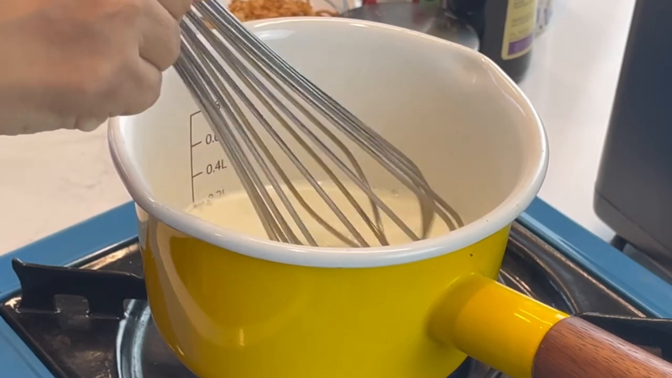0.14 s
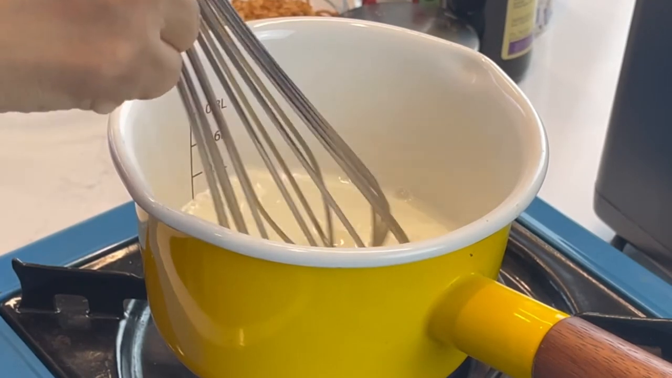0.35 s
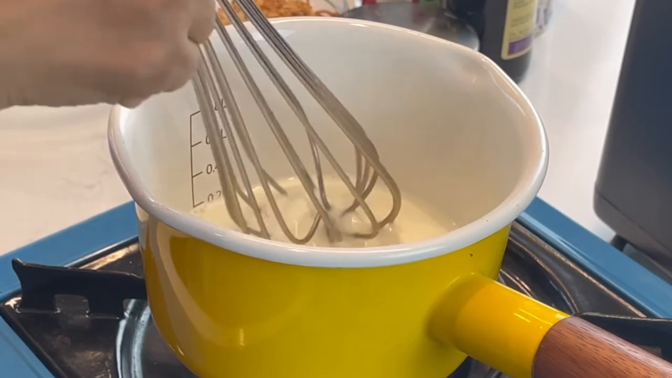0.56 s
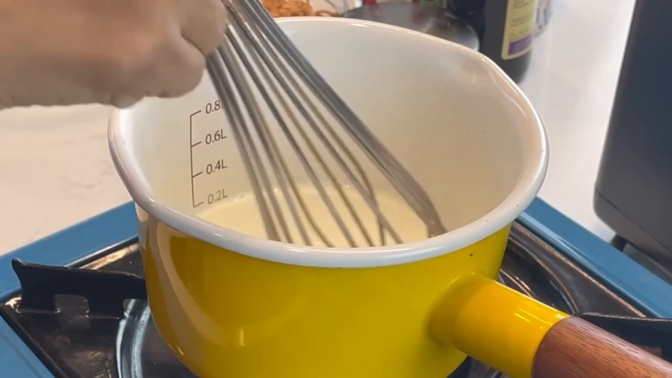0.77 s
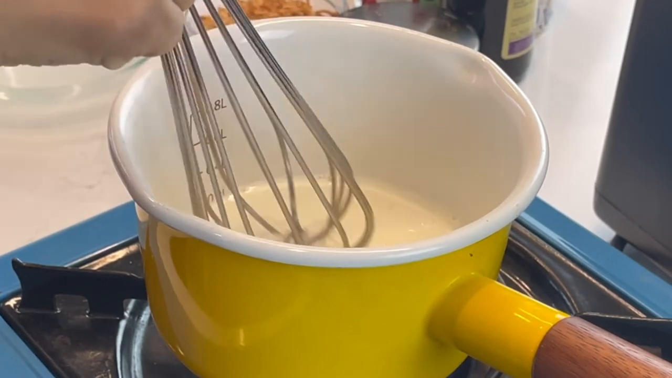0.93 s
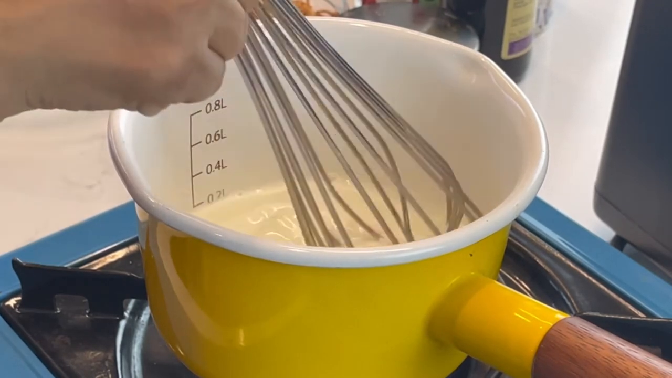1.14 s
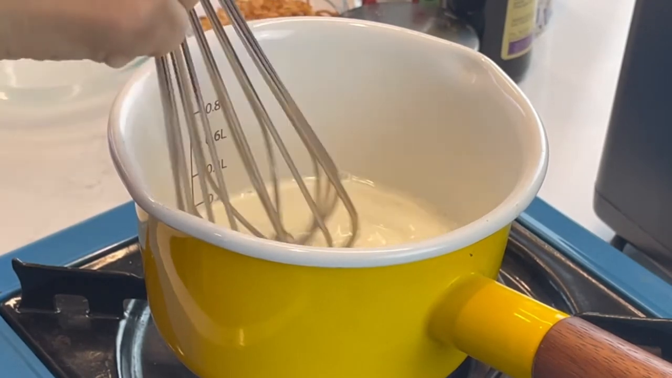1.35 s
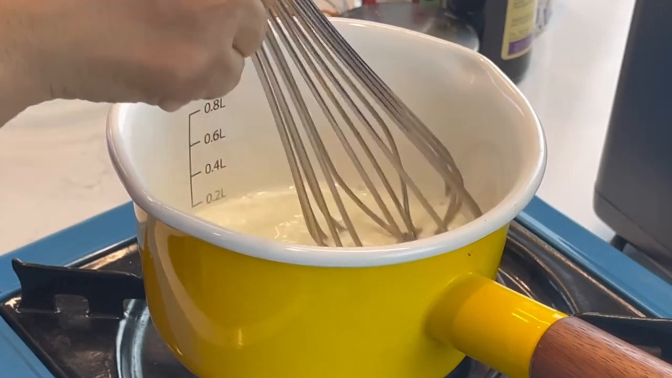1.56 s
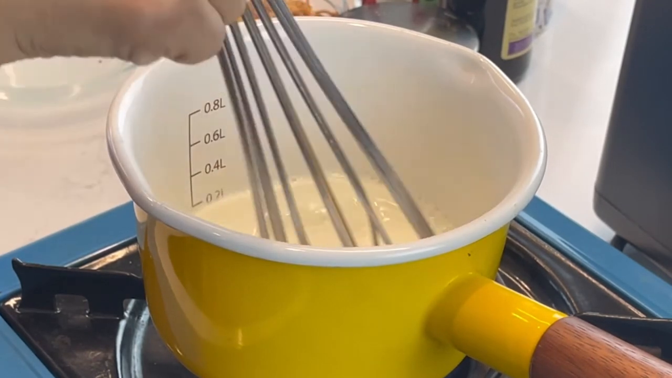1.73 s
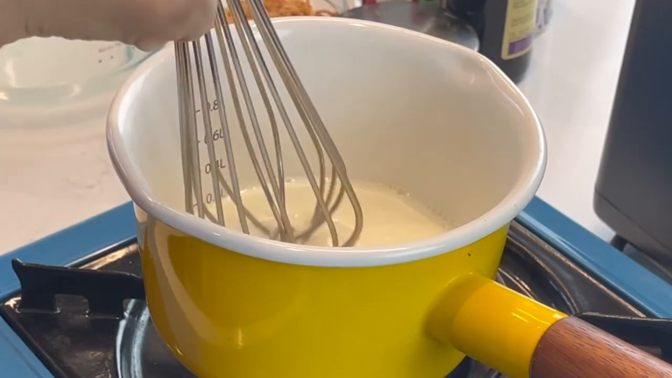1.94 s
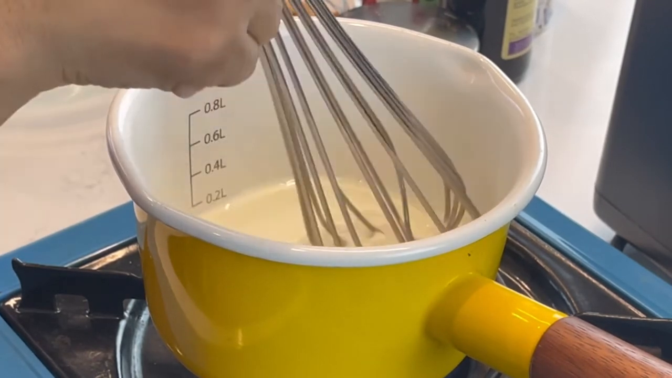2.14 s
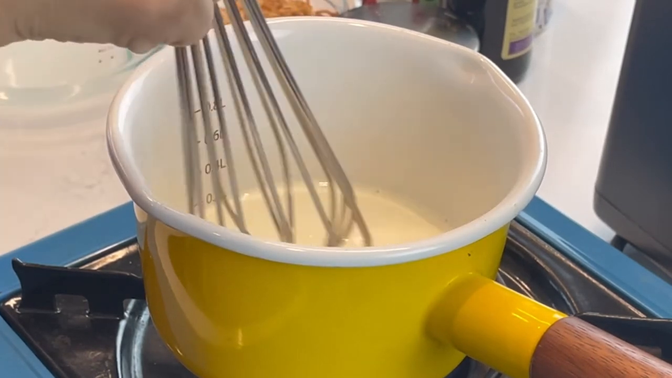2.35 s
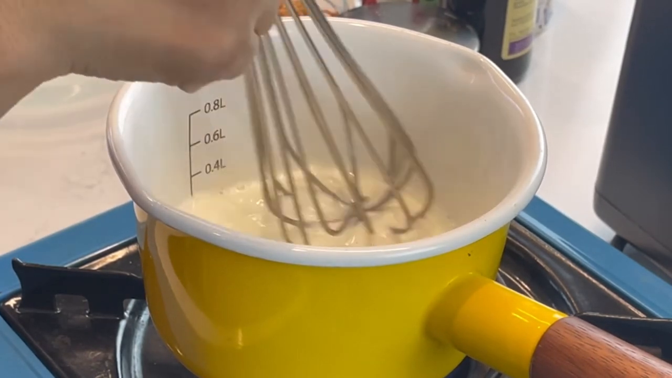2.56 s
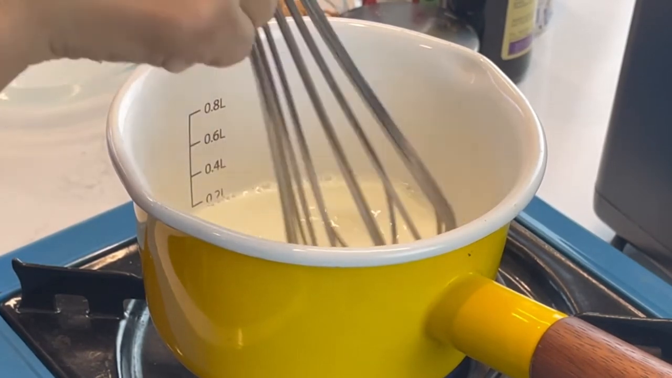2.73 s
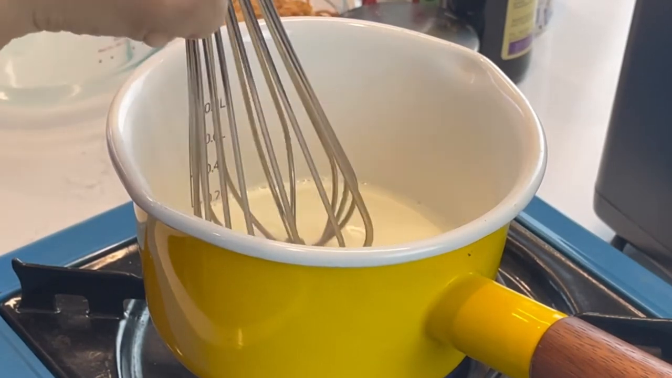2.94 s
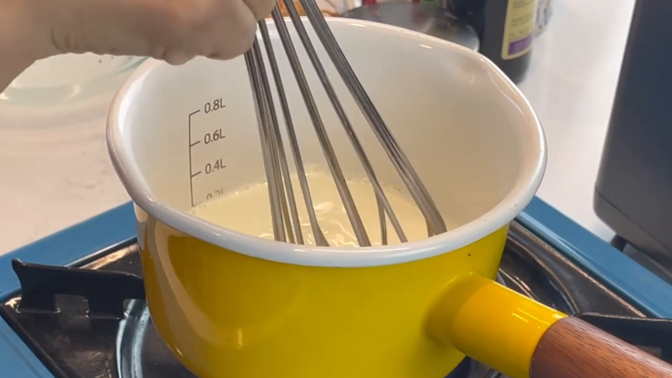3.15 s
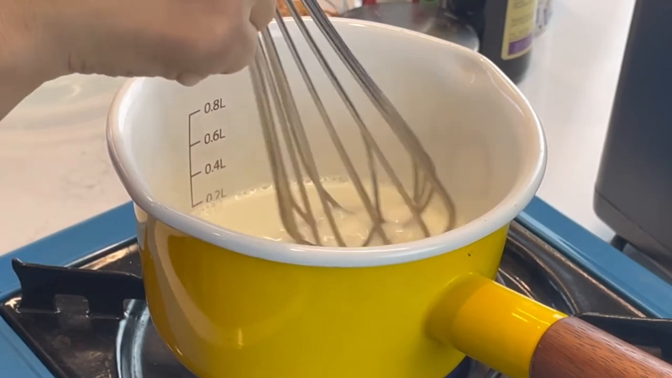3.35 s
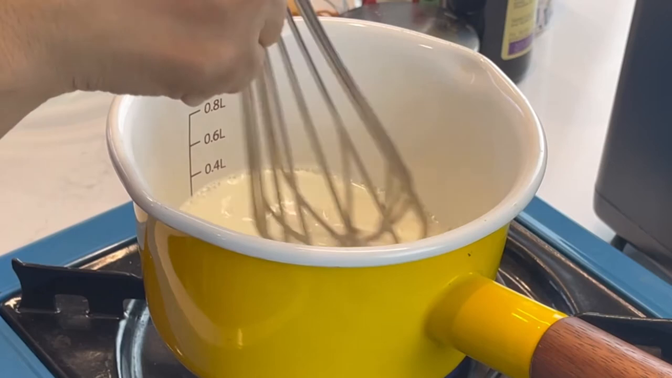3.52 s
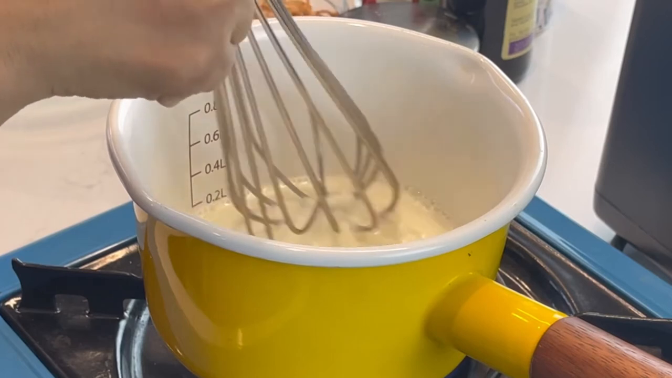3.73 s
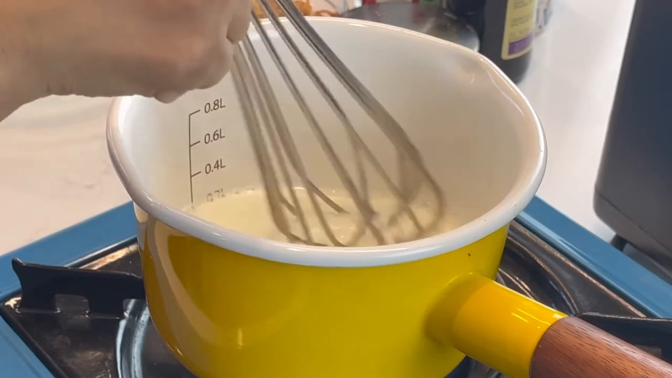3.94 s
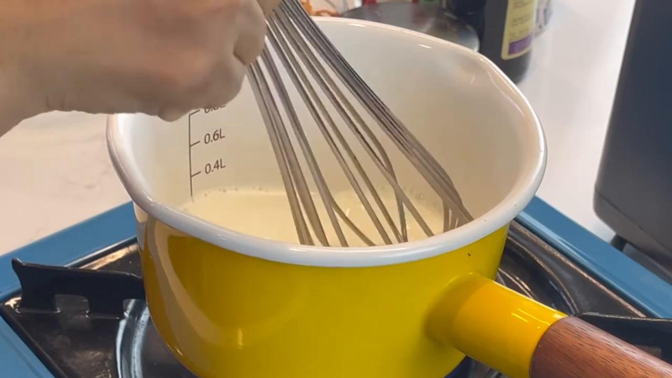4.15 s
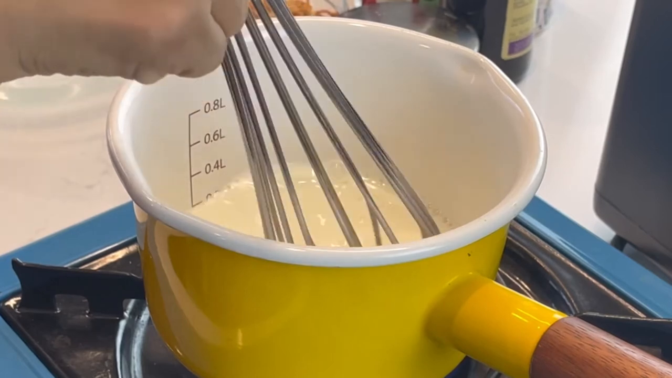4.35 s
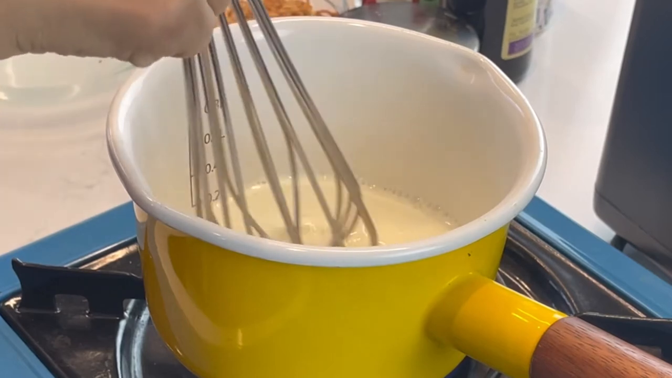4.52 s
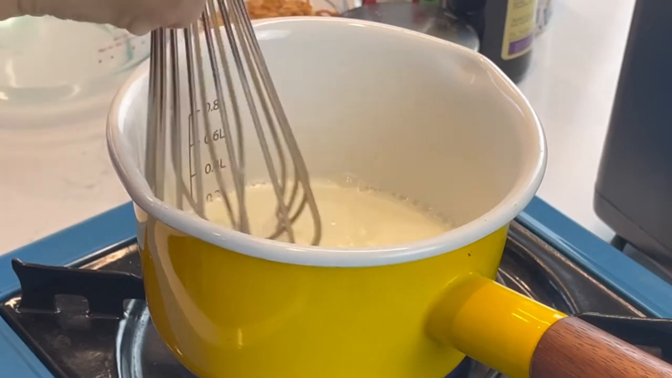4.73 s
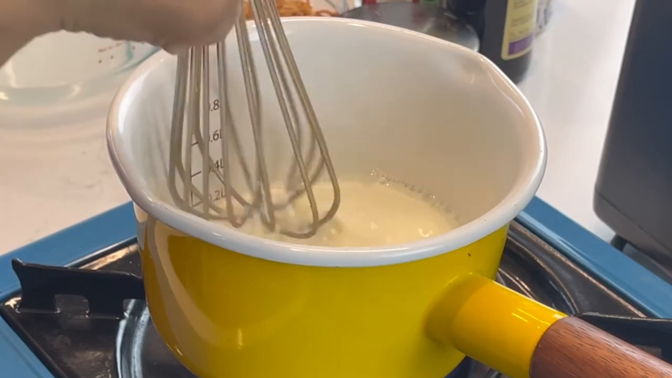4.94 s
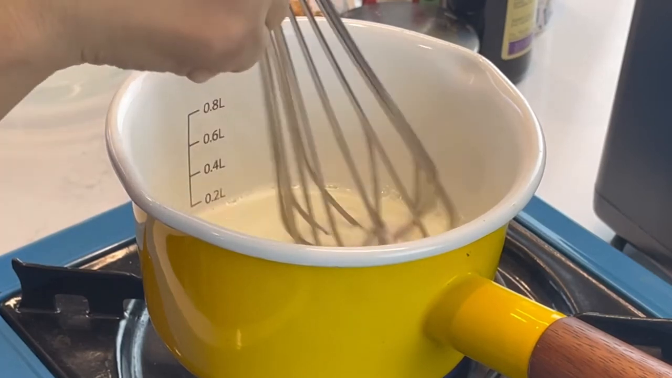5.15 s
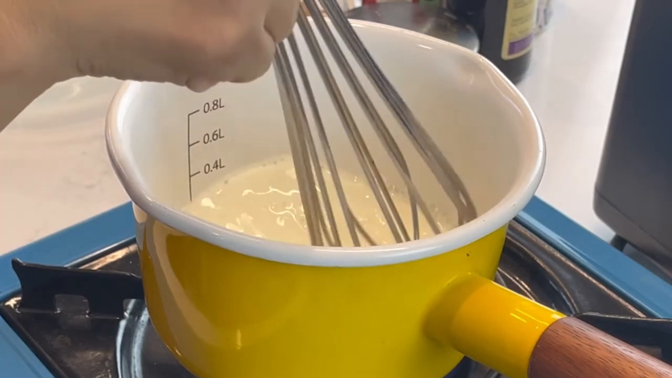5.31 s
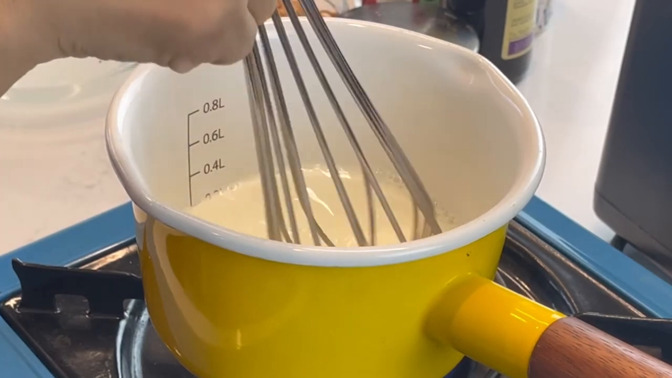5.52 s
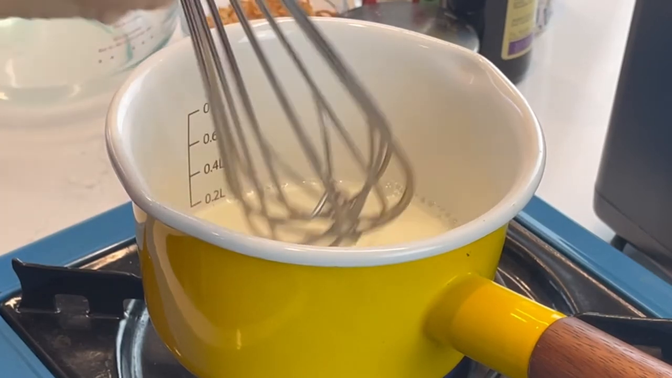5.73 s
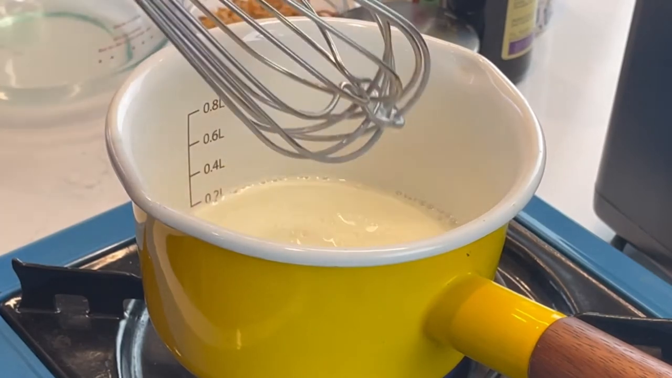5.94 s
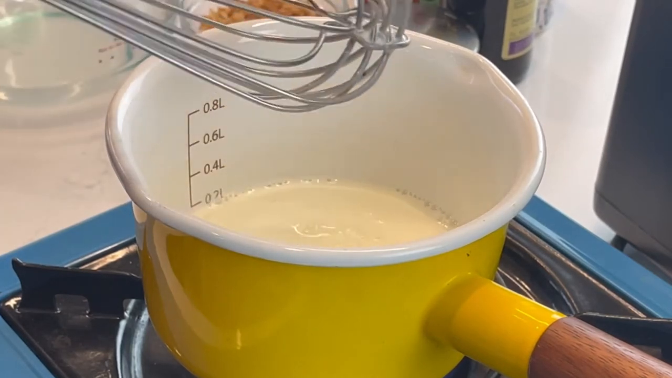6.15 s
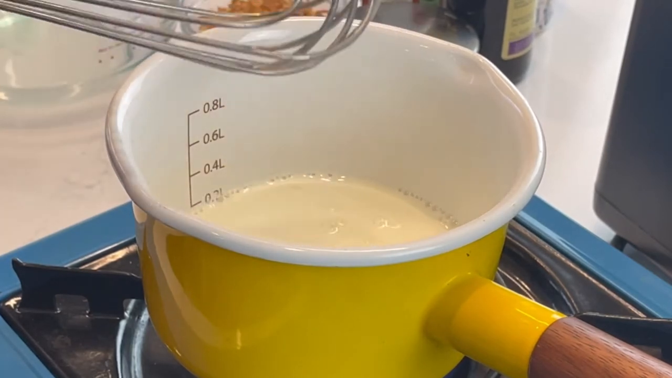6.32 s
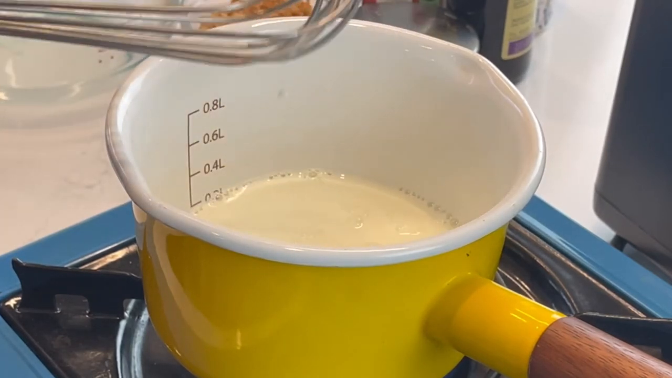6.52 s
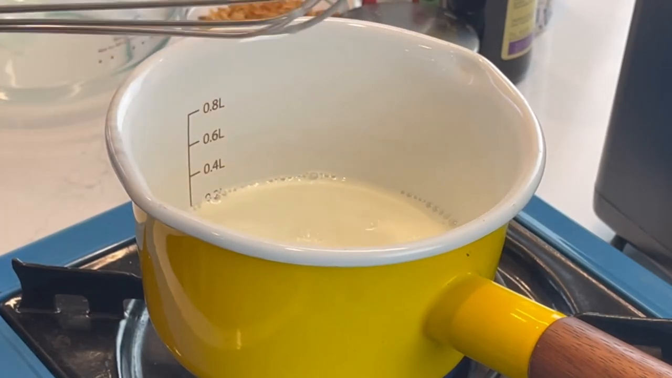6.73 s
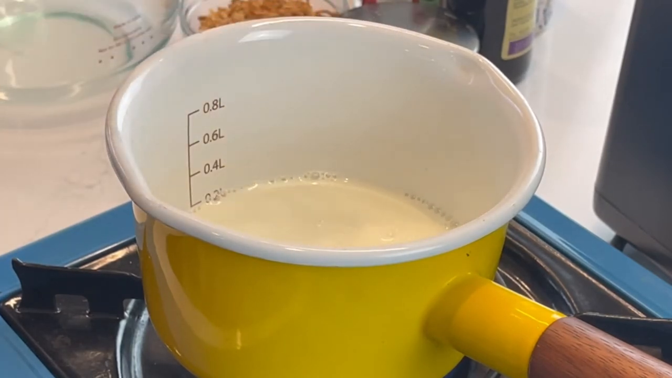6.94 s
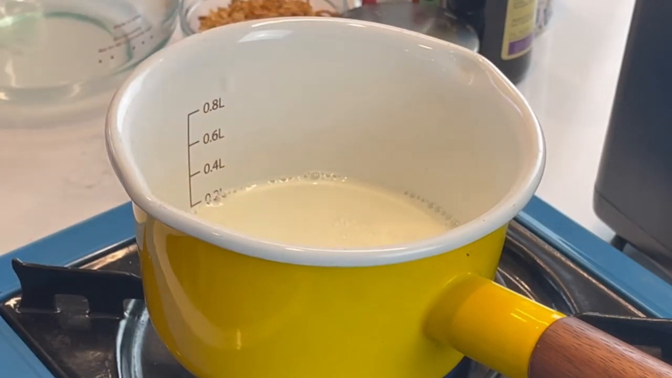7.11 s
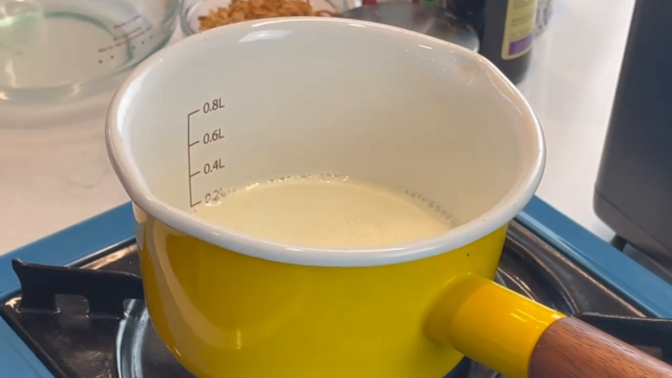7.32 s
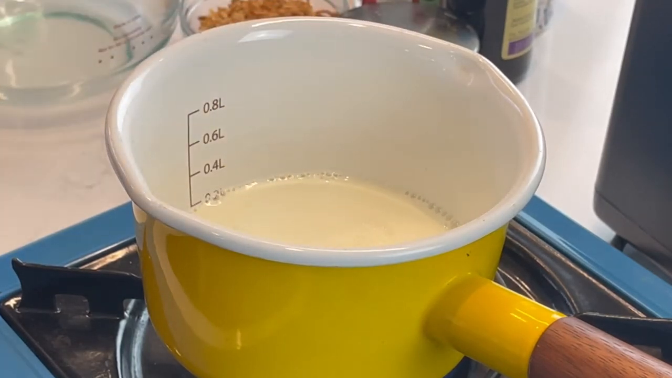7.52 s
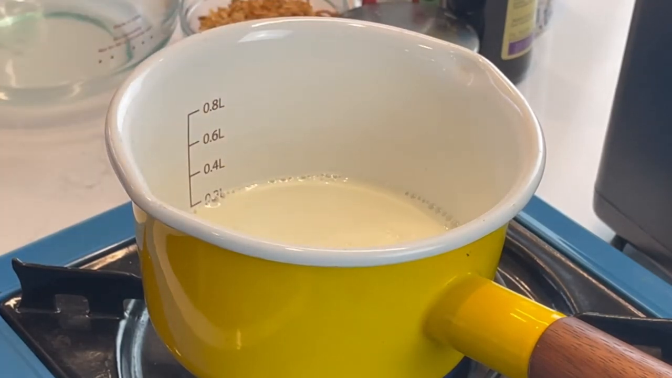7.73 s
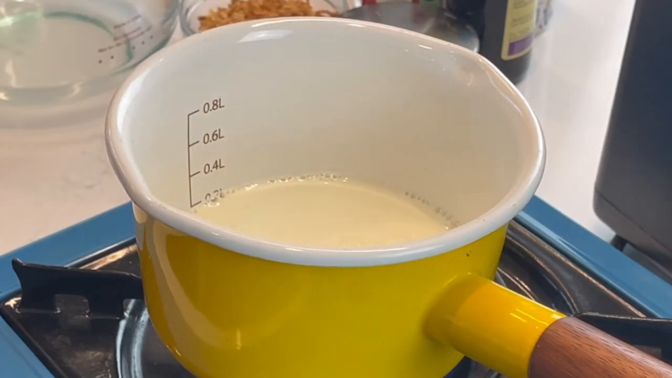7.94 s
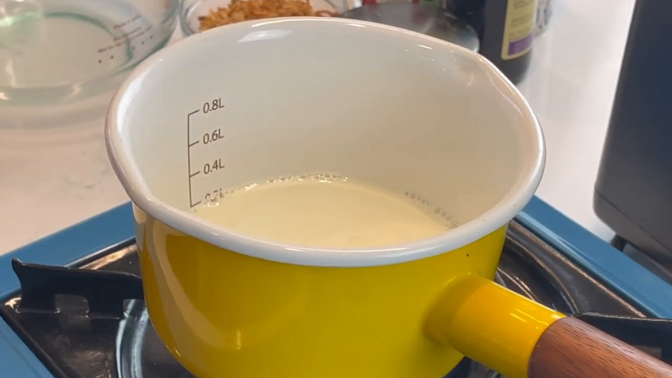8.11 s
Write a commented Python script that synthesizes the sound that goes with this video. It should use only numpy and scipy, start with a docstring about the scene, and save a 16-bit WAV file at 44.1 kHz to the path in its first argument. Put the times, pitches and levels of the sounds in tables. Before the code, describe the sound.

A gas burner hisses faintly in a quiet kitchen while a wire whisk scrapes rapidly over the bottom of an enamel saucepan, sloshing milk with little plops. Uneven metallic knocks, some light and some sharp, set the pan ringing close to the microphone. After the whisking ends, only the hiss and a low rumble remain, broken by a soft, high tinkle of wires as the whisk is put down.

```python
"""A kitchen, one microphone close to a small enamel saucepan on a gas hob. The burner hisses faintly over
the rumble of the room throughout. From the start a wire whisk stirs milk: it scrapes the bottom and
drags in bubbles that gurgle. Again and again it knocks the wall, a clatter of wires that rings the pan.
The stirring stops at about 5.5 s; two seconds later the whisk is laid aside and its wires tinkle."""
import sys
import numpy as np
from scipy import signal
from scipy.fft import rfft, irfft, next_fast_len
from scipy.io import wavfile
from scipy.ndimage import uniform_filter1d

SR = 44100
rng = np.random.default_rng(int(sys.argv[2]) if len(sys.argv) > 2 else 0)


def materialize(psi):
    """Save the field psi as 16-bit PCM at rate SR to the path in sys.argv[1].

    A 1-D psi becomes a single channel; in a 2-D psi each row is a channel.
    """
    bounded = np.clip(np.atleast_2d(psi).T, -1, 1)
    quanta = np.round(bounded * 32767).astype(np.int16)
    wavfile.write(sys.argv[1], SR, quanta)


N = 364707


def amp(db):
    """Decibels to gain."""
    return np.exp(np.asarray(db) * (np.log(10) / 20))


def unit_rms(x):
    """Scales to rms 1."""
    return x / np.sqrt(np.mean(x ** 2) + 1e-20)


def at_hz(points, hz):
    """Interpolates (Hz, value) points on a log-frequency axis."""
    f, value = np.transpose(points)
    return np.interp(np.log(hz + 1), np.log(f + 1), value)


def curve(rows, column, outside):
    """One column of a time table, for every sample."""
    rows = np.array(rows)
    return np.interp(np.arange(N) / SR, rows[:, 0], rows[:, column], outside, outside)


def add(mix, start_s, sound):
    """Mixes a sound in at its start time."""
    part = mix[round(start_s * SR):][:len(sound)]
    part += sound[:len(part)]


def coloured(x, spectrum):
    """Filters by (Hz, dB) points."""
    size = next_fast_len(len(x))
    gain = amp(at_hz(spectrum, np.fft.rfftfreq(size, 1 / SR)))
    return irfft(rfft(x, size) * gain, size)[:len(x)]


def causal(x, gain):
    """Filters by gain(Hz) with minimum phase, so that nothing sounds before a blow."""
    cepstrum = irfft(np.log(gain(np.fft.rfftfreq(8192, 1 / SR)) + 1e-9))
    cepstrum[1:4096] *= 2
    cepstrum[4097:] = 0
    return signal.fftconvolve(x, irfft(np.exp(rfft(cepstrum))))[:len(x)]


def resonate(x, hz, width):
    """One resonance applied twice, at rms 1; a moving one is shifted to zero, smoothed and shifted back."""
    r = np.exp(-np.pi * width / SR)
    if np.ndim(hz) == 0:
        pole = r * np.exp(2j * np.pi * hz / SR)
        return unit_rms(signal.lfilter([1], [1, -2 * pole, pole * pole], x).real)
    turn = np.exp(2j * np.pi * np.cumsum(hz) / SR)
    return unit_rms((turn * signal.lfilter([1], [1, -2 * r, r * r], x / turn)).real)


def wander(per_s):
    """Slow random drift of rms 1."""
    steps = rng.standard_normal(int(N / SR * per_s) + 3)
    return unit_rms(np.interp(np.arange(N) / SR * per_s, np.arange(len(steps)), steps))


def swells(rows, rise_db_s, fall_db_s, db_column=2):
    """Gain of swells (start s, hold s, ..) that rise, hold and fall; their powers add."""
    t, rows = np.arange(0, N / SR + .01, .002), np.array(rows)
    early = np.maximum(rows[:, :1] - t, 0)
    late = np.maximum(t - rows[:, :1] - rows[:, 1:2], 0)
    db = rows[:, [db_column]] - rise_db_s * early - fall_db_s * late
    return np.interp(np.arange(N) / SR, t, np.sqrt((amp(db) ** 2).sum(0)))


# The room behind the pan: its air and its rumble. Each row: frequency in Hz, relative level in dB.
AIR_SPECTRUM = [(41, -33), (70, -3), (145, -2.5), (321, -12.5), (649, -18), (695, -19.5), (1280, -23),
                (1930, -28), (4280, -26.5), (5250, -29), (6300, -20), (7730, -28.5), (16000, -33.5)]
RUMBLE_SPECTRUM = [(8, -32), (14, -3.5), (32, -8), (42, -6.5), (49, 0), (56, -3), (63, -20.5), (80, -24.5),
                   (110, -57)]


def kitchen():
    """Steady room tone: broad noise over a deep rumble."""
    return sum(amp(db) * unit_rms(coloured(rng.standard_normal(N), spectrum))
               for spectrum, db in ((AIR_SPECTRUM, -61), (RUMBLE_SPECTRUM, -51.5)))


# Whistles in the gas under the pan. Each row: pitch in Hz, width in Hz before widening, relative dB.
GAS_WHISTLES = [(1240, 52, -7.5), (4360, 40, -8), (4750, 52, -6.5), (4900, 21, -9.5), (5630, 31, -6),
                (6200, 26, -2), (6355, 100, -1), (6530, 40, -2.5), (7260, 87, -12.5), (8180, 97, -5.5),
                (10760, 56, -17), (11400, 68, -21.5), (12520, 130, -16), (13500, 150, -17)]
# The whole hiss. Each row: time in seconds, level in dB.
HISS_LEVEL = [(0.0, -67), (8.27, -67.5)]


def burner():
    """Gas hisses in narrow bands, each wavering on its own."""
    hiss = sum(amp(db + 2.7 * wander(2.5)) * resonate(rng.standard_normal(N), hz, 1.5 * width)
               for hz, width, db in GAS_WHISTLES)
    return unit_rms(hiss) * amp(curve(HISS_LEVEL, 1, outside=-68))


# Modes of the milk-damped bottom, then of wires brushing each other.
# Each row: pitch in Hz, width in Hz before widening, relative level in dB.
BOTTOM_MODES = [(348, 24, -17.5), (620.6, 64, -9.5), (877, 13, -13), (1010, 230, -12.5), (1793, 140, -12),
                (2202, 31, -13), (2420, 56, -19), (2872, 100, -13), (3485, 200, -14), (4230, 200, -12),
                (4510, 22, -20.5), (4767, 55, -17.5), (4908, 26, -21.5), (5430, 71, -14.5), (6560, 57, -16),
                (6900, 35, -29), (7480, 71, -25.5), (8300, 110, -24.5)]
JINGLE_MODES = [(9900, 150, -22), (10500, 220, -23), (11000, 150, -25.5), (12500, 180, -24),
                (13100, 150, -25)]
# Strokes over the bottom, close to the microphone. Each row: start in seconds, hold in seconds,
# scrape level in dB, level of the sugar grit in dB, slosh pitch in Hz.
STROKES = [(.0, 0.054, -57, -60.5, 1000), (.075, .06, -49.5, -58.5, 870), (.27, 0.027, -44.5, -58.5, 710),
           (.33, 0.061, -46, -57, 930), (.43, 0.045, -54, -57.5, 970), (.57, 0.077, -44, -51, 810),
           (.72, .05, -47, -59.5, 850), (.83, 0.039, -50.5, -53, 915), (.96, 0.094, -47.5, -51, 790),
           (1.08, 0.065, -47.5, -57.5, 820), (1.17, 0.016, -51, -53.5, 915),
           (1.255, 0.038, -48.5, -53, 1010), (1.39, 0.0084, -46, -44, 1150),
           (1.465, 0.0042, -40, -43.5, 1200), (1.53, 0.14, -51.5, -55.5, 1000),
           (1.725, 0.0069, -45.5, -52.5, 955), (1.79, 0.06, -54, -57.5, 960),
           (1.88, 0.066, -50, -61.5, 1010), (2.0, 0.071, -43.5, -51, 740), (2.18, 0.04, -46.5, -58, 711),
           (2.255, 0.045, -48.5, -51.5, 1050), (2.335, 0.024, -48.5, -49.5, 1170),
           (2.42, 0.077, -50, -53, 750), (2.57, 0.022, -43, -50.5, 1000), (2.655, .01, -48.5, -61.5, 690),
           (2.745, 0.061, -47.5, -56.5, 1100), (2.84, 0.037, -53, -62, 1004), (2.945, 0.069, -48, -56, 985),
           (3.155, 0.039, -49.5, -58.5, 830), (3.23, 0.036, -49.5, -59, 1060),
           (3.33, 0.019, -52, -60.5, 930), (3.45, 0.062, -46, -50, 1000), (3.56, 0.024, -41, -50, 1080),
           (3.635, 0.011, -49, -54, 636), (3.735, 0.074, -48.5, -55, 900), (3.87, 0.028, -51, -48, 850),
           (3.94, 0.029, -45, -48, 1100), (4.03, 0.0082, -45, -51.5, 920), (4.095, 0.05, -47, -52.5, 1020),
           (4.23, 0.092, -46.5, -47, 1090), (4.35, 0.028, -48.5, -48.5, 1147),
           (4.46, 0.041, -47, -51.5, 980), (4.555, 0.11, -50.5, -52.5, 1080),
           (4.69, 0.053, -47, -56.5, 790), (4.805, 0.056, -47, -50, 1000), (4.94, 0.017, -39.5, -45.5, 642),
           (5.06, .02, -49, -50, 963), (5.17, 0.076, -48.5, -50.5, 1000), (5.28, 0.018, -41.5, -45.5, 994),
           (5.41, 0.024, -43.5, -48, 920), (5.515, 0.0064, -56, -55, 950)]
SCRAPE_RISE_DB_S, SCRAPE_FALL_DB_S = 220, 171.5
GRIT_CLICKS_PER_S = 3000


def stirring():
    """Wires slip over enamel and sugar: dense small clicks ring the bottom while the milk sloshes."""
    sizes = amp(3 * np.minimum(rng.exponential(1, N), 5))
    grit = sizes * (rng.random(N) < GRIT_CLICKS_PER_S / SR) * rng.choice([-1, 1], N)
    friction = unit_rms(grit) + 0.88 * rng.standard_normal(N)
    low = swells(STROKES, SCRAPE_RISE_DB_S, SCRAPE_FALL_DB_S)
    top = swells(STROKES, rise_db_s=348.5, fall_db_s=280.5, db_column=3)
    mid = amp(1.03) * low ** 0.64 * top ** 0.36  # between scrape and grit
    slosh_hz = curve(STROKES, 4, outside=600)  # the hollow between wires and milk
    out = amp(-11.5) * low * resonate(friction, slosh_hz, width=90)
    for hz, width, db in BOTTOM_MODES + JINGLE_MODES:
        level = low if hz < 1500 else mid if hz < 4000 else top
        touch = level * amp(db + 4.5 * wander(16))  # the contact moves, so each mode swells and fades
        out += resonate(friction, hz, 1.2 * width) * touch
    for level, band in (
            (low, [(250, -25.5), (500, -11.5), (1400, -8), (1600, -28.5)]),
            (mid, [(1500, -31.5), (1800, 2.5), (4000, -4.5), (4500, -28.5)]),
            (top, [(3800, -27), (4200, 5.5), (7000, 1), (9000, -5.5), (12000, -8), (16000, -19)])):
        rasp = unit_rms(coloured(friction, [(20, -84.5)] + band + [(22000, -93)]))
        out += amp(-2.5 + 2.3 * wander(18)) * level * rasp
    pressure = amp(1.5 * wander(40))
    return out * pressure


def blip(db, hz, cycles, climb):
    """A short uneven ring whose pitch climbs as it dies away."""
    age = np.arange(int(4 * cycles * SR / hz)) * hz / SR / cycles  # in decay times
    ripple = unit_rms(uniform_filter1d(rng.standard_normal(4096), size=60))
    uneven = 1 + 0.49 * ripple[np.arange(len(age)) % 4096]
    envelope = np.minimum(age / .35, 1) * np.exp(-age)
    phase = 2 * np.pi * cycles * (1 - climb / 2 + climb * age / 2) * age
    return amp(db) * envelope * uneven * np.sin(phase)


BUBBLES_PER_S, BUBBLE_LOW_HZ, BUBBLE_HIGH_HZ = 21, 650, 2000


def gurgles():
    """Each stroke drags small bubbles into the milk; their pitch climbs as they near the surface."""
    bubbles = np.zeros(N)
    for when, high, faint, steep in rng.random((600, 4))[:int(BUBBLES_PER_S * N / SR)]:
        hz = BUBBLE_LOW_HZ * (BUBBLE_HIGH_HZ / BUBBLE_LOW_HZ) ** (high ** 2)
        add(bubbles, when * N / SR, blip(0.5 - 12 * faint, hz, cycles=6.6, climb=.3 * steep))
    return bubbles * swells(STROKES, SCRAPE_RISE_DB_S, SCRAPE_FALL_DB_S)


# Short pitched blips while stirring. Each row: start in seconds, relative level in dB, pitch in Hz,
# cycles per decay time, share by which the pitch climbs per decay time.
BLIPS = [(0.098, -36, 840, 12, 0.074), (0.91, -38, 1010, 15, 0.062), (1.708, -47, 876, 13, 0.08),
         (1.917, -39, 1000, 13, 0.08), (2.111, -42, 611, 13, 0.08), (2.154, -39.5, 662, 12, 0.08),
         (2.468, -41, 1000, 15, 0.08), (2.942, -40, 863, 14, 0.069), (3.122, -43, 1215, 14, 0.08),
         (3.325, -35.5, 990, 14, 0.065), (3.458, -29.5, 993, 15, 0.08), (3.782, -37, 900, 13, 0.08),
         (3.792, -39.5, 603, 12.6, 0.08), (4.035, -34.5, 1077, 13, 0.068), (4.085, -34, 1113, 13, 0.08),
         (4.199, -33, 999, 12.7, 0.08), (4.267, -31, 827, 14, 0.08), (4.345, -31, 1123, 12.4, 0.074),
         (4.453, -33.5, 903, 11, 0.086), (4.539, -31.5, 1300, 13, 0.086), (4.805, -39, 1015, 13, 0.08),
         (5.182, -35, 990, 13, 0.08), (5.397, -36, 1010, 13, 0.08)]


def stirring_blips():
    """Plops in the milk and brief rings of the pan near 1000 Hz."""
    out = np.zeros(N)
    for start_s, db, hz, cycles, climb in BLIPS:
        add(out, start_s, blip(db - 2.5, hz, cycles, climb))
    return out


def noise_tail(t60s):
    """Noise of energy 1 that starts at once and in which each band dies at its own speed."""
    hz, t, bands = signal.stft(rng.standard_normal(SR // 2 + 256), SR, nperseg=128)
    age_s = np.maximum(t - 256 / SR, 0)
    decay = amp(-60 * age_s / at_hz(t60s, hz)[:, None])
    tail = signal.istft(bands * decay, SR, nperseg=128)[1][256:][:SR // 2]
    return tail / np.linalg.norm(tail)


# Crowded modes of wires and wall. Each row: pitch in Hz, width in Hz, relative level in dB.
CLATTER_MODES = [(4110, 47, -7), (4558, 80, 10.5), (5880, 24, 0.5), (8220, 37, -10), (8790, 85, -13.5),
                 (9590, 41, 2.5), (10500, 31, -4), (9930, 32, 3), (12640, 34, -7), (13600, 31, -11.5),
                 (15200, 130, -16), (15500, 60, -14)]
# Decay at the pan, then in the kitchen around it. Each row: frequency in Hz, T60 in seconds.
CLATTER_T60 = [(300, 0.13), (1000, 0.031), (3000, 0.11), (6000, 0.029), (10000, .045), (16000, 0.025)]
KITCHEN_T60 = [(300, .4), (1000, 0.89), (3000, .3), (6000, .3), (10000, 0.33), (16000, 0.24)]
WIRES, REVERB_DB = 24, -14


def clatter(length, landing_s, spectrum):
    """Wires land one after another and briefly excite a crowd of modes; the kitchen answers faintly."""
    def gain(hz):
        power = sum(amp(db) ** 2 / (1 + (2 * (np.maximum(hz, 3500) - mode_hz) / width) ** 2)
                    for mode_hz, width, db in CLATTER_MODES)
        return amp(39 + at_hz(spectrum, hz)) * np.sqrt(power + amp(-2) ** 2)

    lateness = ((np.arange(WIRES) + np.r_[0, rng.random(WIRES - 1)]) / WIRES) ** 1.3
    force = amp(2 * rng.standard_normal(WIRES) - 3.1 * lateness + 5 * (lateness == 0))
    hits = np.zeros(length)
    hits[(SR * landing_s * lateness).astype(int)] = force * rng.choice([-1, 1], WIRES)
    tail = noise_tail(CLATTER_T60) + amp(REVERB_DB) * noise_tail(KITCHEN_T60)
    return causal(signal.fftconvolve(hits / np.linalg.norm(hits), tail)[:length], gain)


# Knocks on the pan wall, close up. Each row: start in seconds; relative levels in dB of clatter,
# bright clatter, upper thud, bottom thud, three wall rings and clink; pitch in Hz of the wire that
# sings out and of the thud in the milk; time over which the wires land in milliseconds.
KNOCKS = [(0.1807, -37, -46, -33.5, -40, -66, -60, -61, -44, 3940, 913, 7.6),
          (0.2762, -59, -71, -48, -41, -59, -66, -58, -62, 4300, 870, 8),
          (0.3102, -50, -58, -34, -42, -55, -66, -57, -64, 4500, 1165, 13.5),
          (0.5989, -27.5, -32, -22, -34, -43.5, -65, -60, -55, 9600, 1046, 10.3),
          (0.8274, -55, -61, -51, -60, -58.5, -51.5, -54.5, -69, 5550, 877, 5),
          (1.0308, -27, -35, -26.5, -38, -51.5, -39, -49, -49.5, 6300, 1244, 8.1),
          (1.3066, -1.5, -11.5, -22.5, -27.5, -25.5, -24.5, -25, -20, 5910, 908, 23.3),
          (1.4625, -28.5, -29.5, -32, -40.5, -40, -51, -63, -51, 11700, 1100, 6),
          (1.6377, -34.5, -38.5, -37, -46, -49, -45, -62, -50, 5600, 1155, 17),
          (1.7241, -56, -70, -32.5, -51, -64.5, -62, -64, -68, 4320, 882, 22),
          (1.792, -48.5, -62, -37.5, -66, -66, -55, -57, -65, 5600, 900, 9),
          (2.0202, -21, -24.5, -28.5, -37, -33.5, -50, -39, -49, 6110, 828, 4.2),
          (2.2562, -46, -54, -39, -62, -64, -60, -56, -60, 5420, 890, 4),
          (2.3484, -10, -23, -35.5, -33.5, -32, -49, -40.5, -19, 5660, 955, 18),
          (2.5594, -27, -35, -31.5, -39, -41, -43, -46, -49, 5490, 1240, 7.9),
          (2.7313, -63, -68, -34.5, -51, -59, -58, -54, -67, 4290, 1240, 24),
          (3.154, -61, -61, -32, -48.5, -62, -57, -58.5, -68, 4330, 817, 11.5),
          (3.497, -12, -22.5, -21, -31.5, -23, -30.5, -36, -36.5, 10750, 1240, 11),
          (3.8902, -18, -26, -29.5, -41.5, -37, -34.5, -46, -43, 5580, 1274, 21),
          (4.0851, -45, -56, -44, -41.5, -75, -65, -59, -62, 4510, 1130, 7),
          (4.2795, -25.5, -30.5, -32, -62, -52, -35, -52.5, -44, 12400, 812, 16),
          (4.455, -43, -58, -41.5, -53, -58, -56.5, -57, -61, 5430, 900, 8.6),
          (4.5858, -45, -55, -40, -65, -67, -59, -50, -63, 5600, 883, 7.8),
          (4.6468, -16, -25.5, -37.5, -50.5, -63, -54, -46, -49, 6380, 1140, 24),
          (4.85, -3.5, -12.5, -26, -27.5, -22, -26.5, -20.5, -25.5, 5920, 1276, 18),
          (5.216, -12.5, -21.5, -20.5, -30.5, -22.5, -40, -46.5, -32.5, 5990, 968, 8.4)]
# Body, fourth wall ring, rim, side, wire and whisk lie between upper thud and clatter in level.
# Each entry: share of the clatter from 0 to 1, offset in dB.
KNOCK_BLENDS = {"body": (0.5, -6.5), "fourth": (.4, -22), "rim": (0.59, -8), "side": (.2, -13.5),
                "wire": (.98, -7.5), "whisk": (0.74, -14)}
# Long rings of the pan. Each row: pitch in Hz, index into family_db.
PAN_MODES = [(345, 1), (450, 1), (662, 1), (1000, 2), (1230, 2), (1323, 9), (1840, 3), (1925, 3), (2395, 4),
             (2395, 4), (2720, 5), (2998, 6), (3343, 7), (3822, 8), (4200, 8), (4667, 10), (4920, 8),
             (5532, 0), (5958, 0), (6215, 0), (6440, 0)]
# How those same modes ring. Each row: relative level in dB, T60 in seconds.
PAN_DECAYS = [(-7, 0.18), (-9, 0.19), (-2.5, 0.34), (-6, 0.048), (-10, .1), (4.5, .21), (-12.5, 0.074),
              (-3.5, 0.17), (-3, .2), (-7.5, 0.68), (3.5, 0.24), (3.5, 0.4), (-2.5, 0.54), (-7.5, 0.13),
              (-9, 0.22), (1.5, 0.12), (-14, 0.21), (-26, .3), (-28, 0.11), (-25, 0.13), (-26.5, .27)]
# Rings of the whisk itself. Each row: pitch in Hz, relative level in dB, T60 in seconds.
WHISK_MODES = [(4520, -1.5, 0.1), (7800, -3.5, 0.097), (9440, -5, 0.061), (11340, 3.5, 0.093),
               (12700, -3.5, 0.085)]


def knock(clatter_db, bright_db, upper_db, bottom_db, first_db, second_db, third_db, clink_db,
          wire_hz, thud_hz, landing_ms):
    """The whisk strikes the wall: the wires clatter, the milk thuds, pan and whisk ring on."""
    def ring(hz, db, t60):
        return amp(db - 60 * t / t60) * np.sin(2 * np.pi * hz * t)

    t, landing_s = np.arange(int(.7 * SR)) / SR, landing_ms / 1000
    body_db, fourth_db, rim_db, side_db, wire_db, whisk_db = (
        share * clatter_db + (1 - share) * upper_db + db for share, db in KNOCK_BLENDS.values())
    spectrum = [(200, bottom_db - 41), (500, bottom_db - 4), (1200, upper_db - 8), (2000, body_db - 6),
                (3000, body_db - 7), (4300, rim_db - 8.5), (6000, clatter_db - 3.5),
                (7500, clatter_db - 14.5), (11000, bright_db - 2.5), (16000, bright_db - 9)]
    impact = clatter(len(t), landing_s, spectrum)
    family_db = [clatter_db, bottom_db, upper_db, body_db, first_db, second_db, third_db, fourth_db,
                 rim_db, side_db, clink_db]
    pan = sum(ring(hz, family_db[family] + db + rng.uniform(-1.2, 0), t60)
              for (hz, family), (db, t60) in zip(PAN_MODES, PAN_DECAYS))
    pan *= np.minimum(t / (0.32 * landing_s), 1)  # the pan takes up the blow more slowly than the wires
    whisk = sum(ring(hz, whisk_db + db, t60) for hz, db, t60 in WHISK_MODES)
    wire = ring(wire_hz, wire_db + 2, t60=0.087)
    thud = ring(thud_hz, upper_db - 5.5, t60=0.17)
    build = np.minimum(t / (0.11 * landing_s), 1)  # the rings build while wires still land
    fade_out = np.minimum((t[-1] - t) / .1, 1)
    return (impact + (pan + whisk + wire + thud) * build) * fade_out


# Low sways beneath the stirring. Each row: start in seconds, hold in seconds, level in dB.
SWAYS = [(1.42, 0.17, -34), (2.03, .1, -56)]


def low_sway():
    """Noise at the lower edge of hearing swells quickly and dies away."""
    noise = resonate(rng.standard_normal(N), hz=18, width=17)
    return noise * swells(SWAYS, rise_db_s=421.5, fall_db_s=104)


# The whisk laid aside near the pan. Each row: start in seconds, relative level of the tick in dB,
# level of the lower ring in dB, lower pitch in Hz, upper pitch in Hz.
TINKLES = [(7.412, -50, -55, 8790, 10280), (7.4182, -49, -51, 8700, 10300),
           (7.431, -46.5, -59, 8330, 12300), (7.4514, -56, -67.5, 8040, 12400),
           (7.5033, -53.5, -55.5, 8770, 9780), (7.5394, -49, -53, 8760, 12400),
           (7.556, -34, -48, 7600, 12400), (7.569, -42, -68.5, 7260, 12300),
           (7.8007, -58.5, -63.5, 8700, 10300), (7.814, -59, -69.5, 8840, 10200),
           (7.8394, -61, -72, 7260, 11020), (7.894, -58, -56, 8350, 11900), (7.9483, -56, -52, 8300, 11570),
           (7.9644, -58, -58, 8400, 11900), (7.9794, -58, -61.5, 8400, 10000)]
# Its wires slide. Each row: start in seconds, hold in seconds, level in dB.
WIRE_SLIDES = [(7.43, .005, -61), (7.548, .012, -57), (7.806, .01, -68), (7.95, 0.019, -67)]
TINKLE_T60_S = 0.042


def tinkles():
    """Loose wires slide and tick against each other, each tick with two short high rings."""
    ticks, t = np.zeros(N), np.arange(SR // 5) / SR
    for start_s, tick_db, low_db, low_hz, high_hz in TINKLES:
        click = amp(tick_db - 9) * np.exp(-t / 0.00081) * np.diff(rng.standard_normal(len(t) + 2), 2)
        low_ring = amp(low_db) * np.sin(2 * np.pi * low_hz * t)
        high_ring = amp(tick_db - 6) * np.sin(2 * np.pi * high_hz * t)
        add(ticks, start_s, click + amp(-60 * t / TINKLE_T60_S) * (low_ring + high_ring))
    slide = unit_rms(coloured(rng.standard_normal(N), [(5000, -40.5), (9000, -3), (16000, 0.5)]))
    return ticks + slide * swells(WIRE_SLIDES, rise_db_s=170, fall_db_s=300)


def scene():
    """All sources as they reach the microphone, in mono."""
    mix = stirring() + stirring_blips() + gurgles() + tinkles() + kitchen() + burner() + low_sway()
    for start_s, *blow in KNOCKS:
        add(mix, start_s, knock(*blow))
    return mix[None]


# Response of the microphone. Each row: frequency in Hz, gain in dB.
MIC_RESPONSE = [(15700, -1.5), (15900, -18), (17000, -40.5)]
CEILING, BAND_LIMIT_HZ = .97, 17150


def record(dry):
    """The microphone falls away at the top and rounds off the loudest peaks; then the band limit."""
    heard = coloured(dry[0], MIC_RESPONSE)[None]
    rounded = CEILING * np.tanh(heard / CEILING)
    lowpass = signal.firwin(511, BAND_LIMIT_HZ, window=("kaiser", 9), fs=SR)
    return signal.oaconvolve(rounded, lowpass[None], "same")


dry = scene()
out = record(dry)
materialize(out)
```